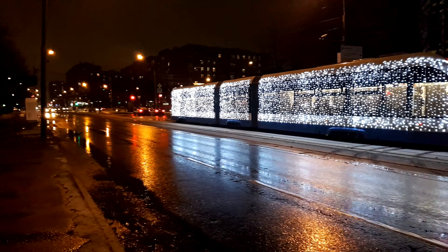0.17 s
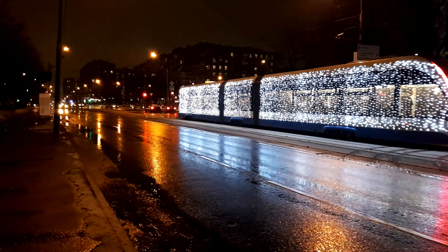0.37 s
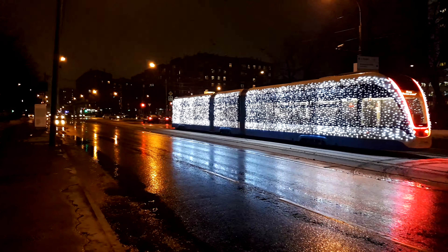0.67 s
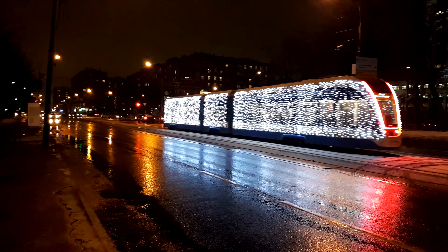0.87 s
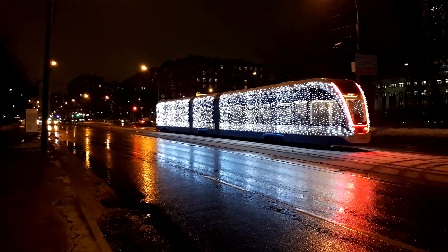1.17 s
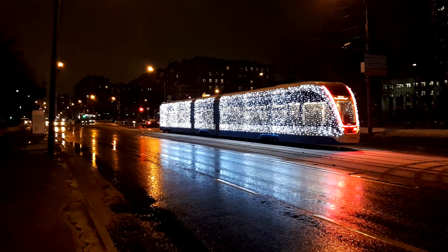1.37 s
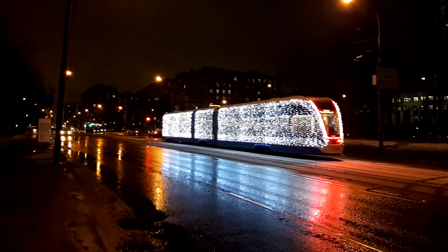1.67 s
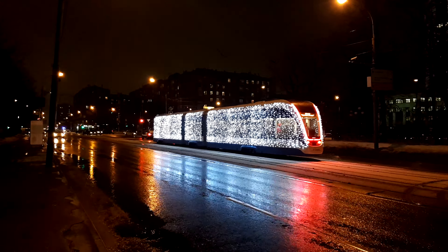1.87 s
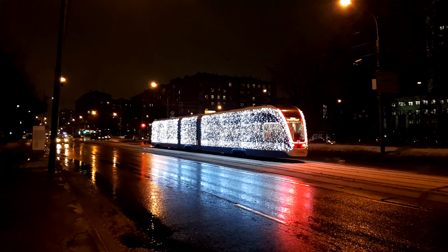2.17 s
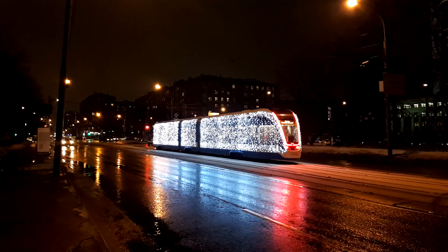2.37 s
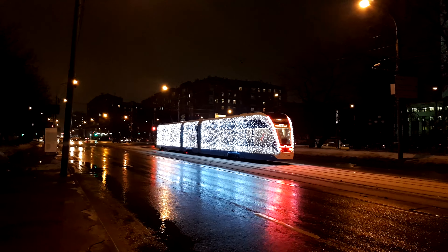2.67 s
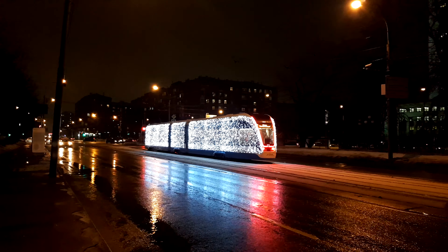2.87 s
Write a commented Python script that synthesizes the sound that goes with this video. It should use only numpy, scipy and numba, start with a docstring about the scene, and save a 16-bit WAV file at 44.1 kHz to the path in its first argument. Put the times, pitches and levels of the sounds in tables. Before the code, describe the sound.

Tram wheels roar and hiss close by, then fade quickly beneath low wind rumble and sharp crackling buffets on an outdoor phone microphone; later a soft rail rub and thin steady whine emerge, the right side muffled.

```python
"""From the start a tram rolls along a wet street: a breeze rumbles in the two ports of a phone,
wheels roar and softly rub, the road hisses and the traction inverter whines thinly. All are shaped noise
except the whine, which is a set of sine tones. Soon gusts buffet the ports as short bursts of turbulence,
and then sharp eddies crack on the left port. The right port is muffled, so most treble is on the left."""
import sys
import numpy as np
from scipy import signal
from scipy.fft import rfft, irfft, next_fast_len
from scipy.io import wavfile
from scipy.ndimage import map_coordinates
from numba import njit

SR = 44100
rng = np.random.default_rng(int(sys.argv[2]) if len(sys.argv) > 2 else 0)


def bounce(signal):
    """Save signal as a 16-bit WAV file at the path given by the first command-line argument."""
    frames = np.transpose(np.atleast_2d(signal))
    limited = np.clip(frames, -1, 1)
    pcm = np.round(limited * 32767).astype(np.int16)
    wavfile.write(sys.argv[1], SR, pcm)


N = 132741  # length in samples, about 3 s


def undb(db):
    """Turn decibels into an amplitude gain."""
    return 10 ** (np.asarray(db) / 20)


def unit(x):
    """Scale a sound to an average strength (rms) of 1."""
    return x / np.sqrt(np.mean(x ** 2) + 1e-20)


def curve(rows, axis=1):
    """Join the points of one column of a time table by straight lines, one value per sample."""
    rows = np.array(rows, float)
    return np.interp(np.arange(N) / SR, rows[:, 0], rows[:, axis])


def colour(x, points):
    """Filter a sound so that each pitch is raised or lowered along a (pitch_hz, gain_db) curve."""
    pitch_hz, gain_db = np.array(points, float).T
    size = next_fast_len(N)
    bin_hz = np.maximum(np.fft.rfftfreq(size, 1 / SR), 1)
    gain = undb(np.interp(np.log(bin_hz), np.log(pitch_hz), gain_db))
    return irfft(rfft(x, size) * gain, size)[:N]


def noise(points):
    """Make coloured noise of rms 1."""
    return unit(colour(rng.standard_normal(N), points))


def walk(hz):
    """Wander smoothly through random values of spread about 1, hz new values a second."""
    values = rng.standard_normal(4096)
    return map_coordinates(values, [np.arange(N) / SR * hz], order=3, mode="mirror")


def ringing(modes):
    """Let rough contact (noise) drive narrow resonances, each weighted by its level."""
    total = np.zeros(N)
    for pitch_hz, width_hz, level_db in modes:
        b, a = signal.iirpeak(pitch_hz, pitch_hz / width_hz, SR)
        total += undb(level_db) * unit(signal.lfilter(b, a, rng.standard_normal(N)))
    return total


@njit
def lowpass(x, corner_hz):
    """Remove what lies above a moving corner, with a two-pole filter that keeps two running states."""
    out, band, low = np.empty(len(x)), 0., 0.
    for i in range(len(x)):
        g = np.tan(np.pi * corner_hz[i] / SR)
        middle = (band + g * (x[i] - low)) / (1 + g * (g + 1.3))  # 1.3 sets the damping
        out[i] = low + g * middle
        band = 2 * middle - band
        low = 2 * out[i] - low
    return out


def breeze():
    """Steady wind makes a low rumble from separate noise on each port, so the two are unrelated."""
    # strength of the breeze: start_s [s], left_db [dB], right_db [dB]
    breeze_levels = [(0, -22, -25), (.3, -16, -28.5), (.5, -26.5, -21.5), (.75, -20, -22.5),
                     (1.05, -15.5, -31.5), (1.25, -24, -21.5), (1.4, -25.5, -23.5), (1.7, -21.5, -22.5),
                     (1.9, -21.5, -28.5), (2.2, -26.5, -28), (2.45, -33, -22), (2.65, -29, -33.5),
                     (2.87, -31.5, -24.5), (3, -35, -34)]
    # colour of its rumble: pitch_hz [Hz], relative_db [dB per Hz]
    breeze_colour = [(20, -30.5), (40, -14), (65, -4.5), (110, -4.5), (200, -10), (350, -21), (600, -32.5),
                     (1200, -57), (3000, -82.5)]
    left = noise(breeze_colour) * undb(curve(breeze_levels, axis=1))
    right = noise(breeze_colour) * undb(curve(breeze_levels, axis=2))
    return np.array([left, right])


def wheels():
    """Rolling contact makes a noisy roar and rings the wheels and body; a flange rubs softly on the rail."""
    # colour of wheels on rails: pitch_hz [Hz], relative_db [dB per Hz]
    roll_colour = [(30, 6), (100, 7), (190, 8), (350, -3.5), (550, 2.5), (1000, -3), (1500, -5),
                   (2000, -11), (2800, -17.5), (3500, -14.5), (5000, -31.5), (7000, -60)]
    # level of the rolling: start_s [s], level_db [dB]
    roll_levels = [(0, -25.5), (.25, -29), (.55, -28.5), (.65, -37.5), (1.2, -37), (1.45, -33.5),
                   (1.8, -37), (2.2, -34.5), (3, -32.5)]
    # wheel and body resonances: pitch_hz [Hz], width_hz [Hz], level_db [dB beside the roar]
    wheel_modes = [(760, 180, -19.5), (985, 16, -23), (1522, 16, -23)]
    # resonances of the rubbing flange: pitch_hz [Hz], width_hz [Hz], relative_db [dB]
    flange_modes = [(2085, 770, -1.5), (3330, 480, -7.5)]
    # level of the rub: start_s [s], level_db [dB]
    rub_levels = [(1.5, -52.5), (1.75, -47), (1.92, -40.5), (2.1, -47.5), (3, -47.5)]
    waver_db = 0.41 * walk(17)
    rolling = noise(roll_colour) + ringing(wheel_modes)
    roar = rolling * undb(curve(roll_levels) + waver_db)
    rub = colour(ringing(flange_modes), [(800, -6), (1800, 8), (3500, -0.5), (6500, -27)])
    return roar + undb(curve(rub_levels)) * rub


def wet_road():
    """Spray is hissing noise; its flickering treble sinks faster than the rest when the hiss is weak."""
    # colour of the wet road: pitch_hz [Hz], relative_db [dB per Hz]
    hiss_colour = [(1500, -16.5), (2800, -4.5), (3500, 0.5), (4400, 1), (5050, 8.5), (5650, 0),
                   (6400, -19.5), (7700, -20.5), (9500, -8.5), (12000, -13.5), (15500, -16)]
    # level of the hiss: start_s [s], level_db [dB]
    hiss_levels = [(0, -41.5), (.15, -43), (.3, -47), (.55, -46), (.72, -52), (1.1, -56.5), (1.3, -54.5),
                   (1.45, -49), (1.65, -50), (2.15, -50), (2.4, -45), (3, -44.5)]
    full_db, tilt = -39.5, 0.42  # dB of extra treble loss per dB of hiss below its full level
    flicker_db, flicker_hz = 2, 69.5  # spread and rate
    hiss, level_db = noise(hiss_colour), curve(hiss_levels)
    treble = colour(hiss, [(5800, -60.5), (6800, 0)])
    rest = hiss - treble
    treble_db = tilt * np.minimum(level_db - full_db, 0) + flicker_db * walk(flicker_hz)
    return undb(level_db) * (rest + treble * undb(treble_db))


def inverter():
    """Tones at multiples of the switching rate flutter as the tram moves through its own echoes."""
    # whine: start_s [s], main_db [dB, main tone], overtones_db [dB, base level of the overtones]
    whine_levels = [(0, -43.5, -65.5), (.2, -45.5, -66), (.25, -58, -88), (.7, -74, -93.5),
                    (1.31, -72, -95), (1.33, -49, -84), (1.385, -49.5, -68), (1.55, -48, -75),
                    (1.95, -44.5, -67), (2.22, -50, -71), (2.31, -38, -63), (2.37, -37, -67),
                    (2.45, -48, -65.5), (3, -44.5, -68)]
    # overtones: multiple [times the switching rate], relative_db [dB added to overtones_db]
    whine_partials = [(3, 0), (4, 3), (5, 5.5), (6, -0.8)]
    switch_hz, wander_hz = 2473.8, 2.2
    sag_hz, sag_s = 5, 0.84  # the rate starts this much higher and sinks over this time
    echo_share, echo_hz = 0.3, 114  # strength of the echoes and how fast they change
    fade_db = 1.4  # spread of the slower fading at a multiple of 2
    t = np.arange(N) / SR
    rate_hz = switch_hz + sag_hz * np.exp(-t / sag_s) + wander_hz * walk(45)
    phase = 2 * np.pi * np.cumsum(rate_hz) / SR
    # the main tone sounds at twice the rate, but fades as deeply as a multiple of 2.4
    partials = [(2, 2.4, curve(whine_levels))]
    for multiple, relative_db in whine_partials:
        partials.append((multiple, multiple, relative_db + curve(whine_levels, axis=2)))
    tones = np.zeros(N)
    for multiple, depth, level_db in partials:
        echoes = echo_share * (walk(echo_hz) + 1j * walk(echo_hz))  # shift both strength and phase
        fading_db = fade_db * depth / 2 * walk(18)  # higher tones fade more deeply
        tone = np.real((1 + echoes) * np.exp(1j * multiple * phase))
        tones += undb(level_db + fading_db) * tone
    return np.sqrt(2) * tones  # a steady sine gets its level as rms


def gusts():
    """Short bursts of turbulence strike one port; stronger eddies are both louder and brighter."""
    # gusts: start_s [s], length_s [s], level_db [dB], corner_hz [Hz], port [0 left, 1 right]
    gust_rows = [(0.043, 0.087, -14, 426, 0), (0.149, 0.078, -20, 540, 0), (0.266, 0.026, -13, 650, 0),
                 (0.322, 0.071, -21.5, 293, 0), (0.449, 0.025, -12.5, 270, 0),
                 (0.505, 0.015, -12.5, 243, 0), (0.545, 0.024, -12, 328, 0), (0.575, 0.023, -8, 600, 0),
                 (0.584, 0.025, -16.5, 220, 1), (0.598, 0.022, -13, 1100, 0), (0.623, 0.016, -14.5, 300, 1),
                 (0.628, 0.03, -14, 258, 0), (0.66, 0.045, -14, 270, 1), (0.684, 0.033, -14.5, 615, 0),
                 (.785, 0.086, -20.5, 298, 1), (0.795, 0.0058, -7.5, 480, 0), (0.866, 0.017, -11.5, 590, 0),
                 (0.902, 0.037, -14, 1015, 0), (1.001, 0.055, -21, 330, 0), (1.028, 0.022, -13, 1290, 0),
                 (1.082, 0.014, -16, 1900, 0), (1.11, .016, -20, 800, 0), (1.216, 0.034, -14, 1400, 0),
                 (1.255, 0.043, -11.5, 1620, 0), (1.304, 0.027, -12, 720, 0),
                 (1.426, 0.0606, -18.5, 520, 0), (1.568, 0.055, -12.5, 480, 0), (1.627, 0.02, -12, 720, 0),
                 (1.6, 0.12, -26, 378, 1), (1.66, 0.08, -12, 480, 0), (1.759, 0.043, -13, 614, 0),
                 (1.894, 0.016, -17.5, 317, 0), (1.957, 0.062, -16, 332, 0), (2.09, 0.042, -23, 476, 0),
                 (2.166, 0.033, -17.5, 686, 0), (2.299, 0.11, -25.5, 204, 0), (2.342, 0.031, -17.5, 114, 1)]
    # colour of turbulent pressure at a port: pitch_hz [Hz], relative_db [dB per Hz]
    turbulence = [(20, -24.5), (60, -4), (130, 2.5), (300, -2), (700, -10), (1500, -16.5), (2500, -24),
                  (4000, -31.5), (5500, -39), (6800, -60.5)]
    attack_s, release_s = 0.0018, 0.0071
    eddy_hz, eddy_db, eddy_octaves = 172, 1.5, 0.38  # rate, swing of pressure, swing of the corner
    out, t = np.zeros((2, N)), np.arange(N) / SR
    eddies = [walk(eddy_hz) for _ in out]
    pressure = [noise(turbulence) * undb(eddy_db * eddy) for eddy in eddies]
    for start_s, length_s, level_db, corner_hz, port in gust_rows:
        side = int(port > .5)
        edges_s = [start_s - attack_s, start_s + length_s + 6 * release_s]
        span = slice(*np.searchsorted(t, edges_s))
        age = t[span] - start_s
        rise = np.clip(age / attack_s + .5, 0, 1)
        fall = np.exp(-np.maximum(age - length_s, 0) / release_s)
        force = rise * fall
        # weaker air is duller
        moving_hz = corner_hz * np.sqrt(force) * 2 ** (eddy_octaves * eddies[side][span])
        burst = lowpass(pressure[side][span] * force, np.clip(moving_hz, 40, SR / 4))
        # the level belongs to full force, so a burst with longer edges is weaker on average
        out[side, span] += undb(level_db) * unit(burst) * np.sqrt(np.mean(force ** 2))
    return out


def cracks():
    """Single eddies slap the left port: a steep pressure front, then a few milliseconds of torn air."""
    # cracks: start_s [s], level_db [dB, before the final colouring], corner_hz [Hz]
    crack_rows = [(.591, -8, 5500), (0.614, -11.5, 1500), (.704, -12.5, 1000), (.716, -13, 1300),
                  (.732, -16, 1100), (0.745, -12.5, 1200), (0.761, -13.5, 1200), (.773, -12, 900),
                  (0.778, -12, 1250), (.82, -15, 600), (0.845, -17, 1000), (.876, -12, 2100),
                  (.882, -9, 1300), (0.913, -15, 1500), (.929, -14.5, 1700), (.989, -17, 1100),
                  (1.037, -7.5, 1800), (1.072, -16, 1400), (1.095, -7, 2500), (1.139, -15, 1600),
                  (1.146, -13, 1700), (1.221, -10, 1500), (1.253, -9, 1900), (1.265, -8, 2600),
                  (1.308, -8, 2100), (1.329, -10, 1200), (1.584, -6.5, 2500), (1.632, -12, 900),
                  (1.779, -14.5, 1000), (1.971, -15, 950), (2.056, -21, 1000)]
    tear, decay_s = 0.17, 0.0016  # strength of the torn air behind the front, and its decay
    out, air = np.zeros(N), rng.standard_normal(N)
    length = SR // 20
    age = np.arange(length) / SR
    for start_s, level_db, corner_hz in crack_rows:
        start = int(start_s * SR)
        span = slice(start, start + length)
        front = age == 0  # a single-sample push
        push = front + tear * air[span] * np.exp(-age / decay_s)
        steady_hz = np.full(length, float(corner_hz))
        slap = lowpass(lowpass(push, steady_hz), steady_hz)
        # a lower corner flattens the push more, so make up for it
        out[span] += undb(level_db) * SR / (2 * corner_hz) * slap
    left = colour(out, [(100, -5), (500, 2), (2000, -0.5), (5000, -11), (7500, -21)])
    return np.array([left, np.zeros(N)])


def scene():
    """The tram reaches both ports, its roar alike mainly in the bass; wind strikes each port on its own."""
    # response of the muffled right port: pitch_hz [Hz], gain_db [dB]
    right_port = [(100, 13.5), (350, -4.5), (600, -1.5), (1000, -12.5), (1600, -20.5), (2800, -19.5),
                  (3600, -33.5), (5000, -37.5), (7000, -29), (15000, -19.5)]
    roar, whine = wheels(), inverter()
    shared = colour(roar, [(600, -9.5), (1400, -13.0), (3000, -30.0)])
    diffuse = colour(wheels(), [(600, -9.5), (1400, 3.5)])  # separate noise, only on the right
    left = roar + wet_road() + whine
    right = colour(shared + diffuse + wet_road() + whine, right_port)
    return np.array([left, right]) + breeze() + gusts() + cracks()


def record(dry):
    """The phone flattens the hardest buffets towards full scale, then cuts the top with a steep filter."""
    top_hz = 15750
    held = dry / (1 + dry ** 8) ** (1 / 8)
    top_cut = signal.ellip(10, .1, 80, top_hz, fs=SR, output="sos")
    return signal.sosfilt(top_cut, held)


dry = scene()
out = record(dry)
bounce(out)
```